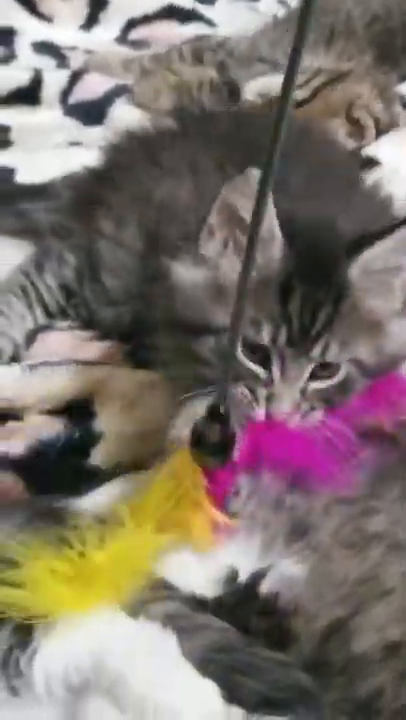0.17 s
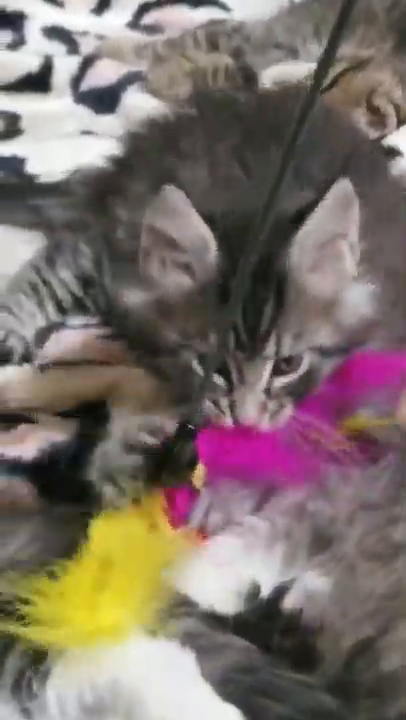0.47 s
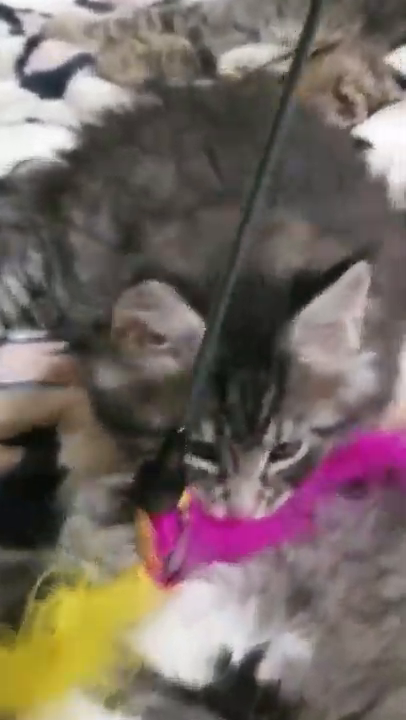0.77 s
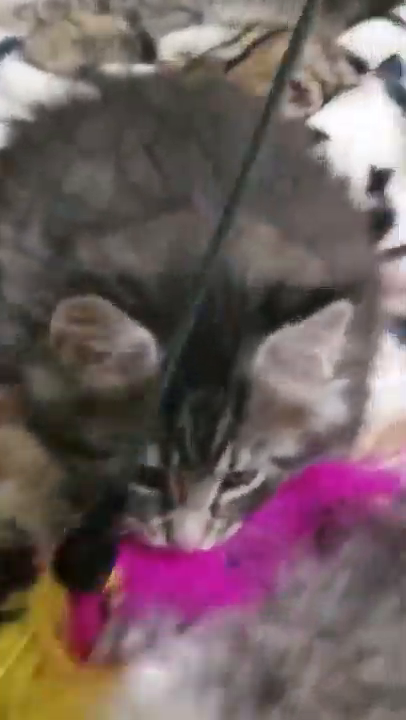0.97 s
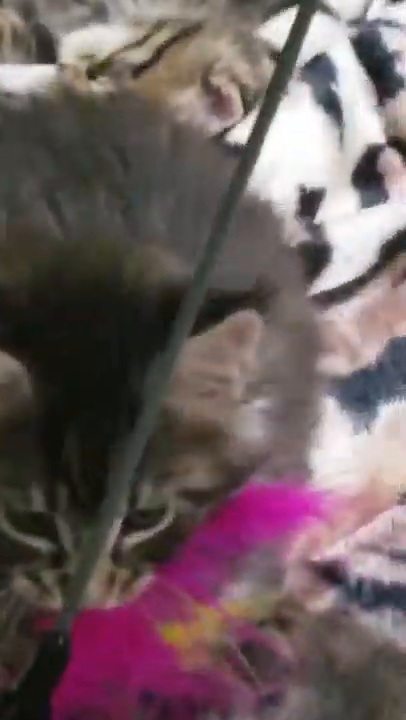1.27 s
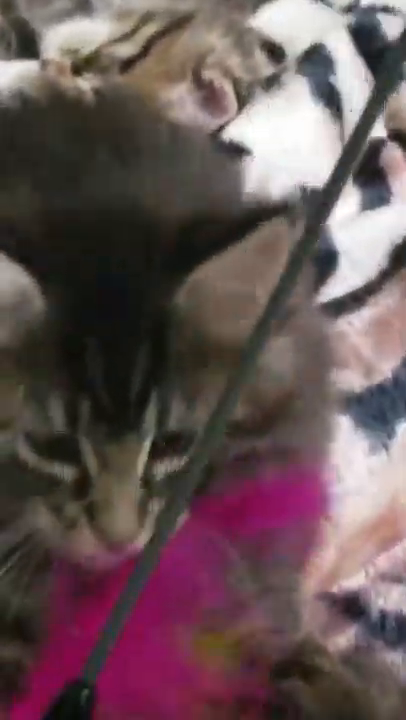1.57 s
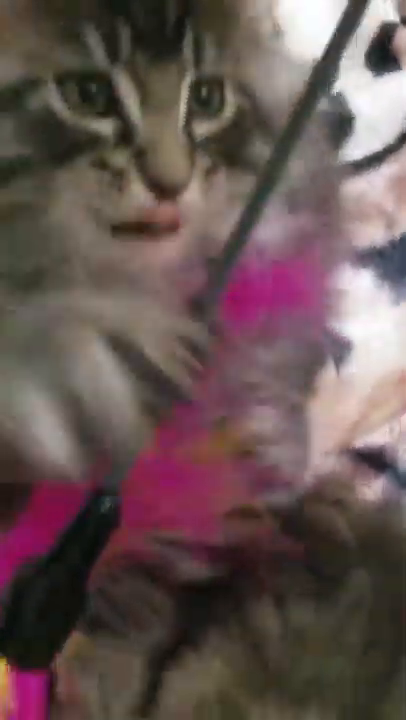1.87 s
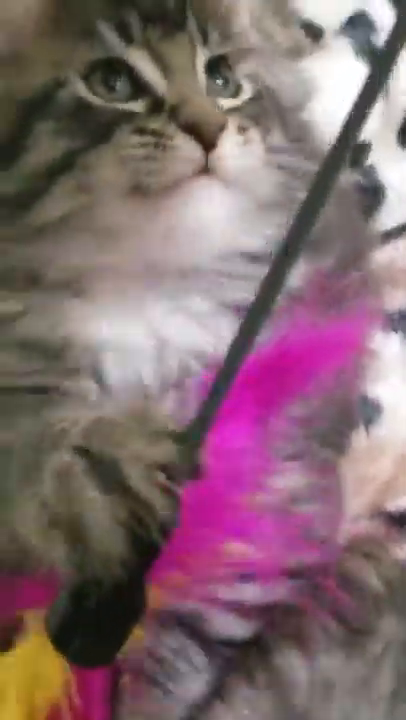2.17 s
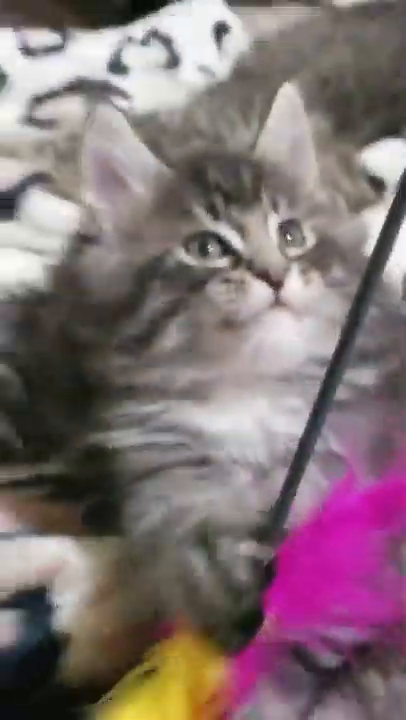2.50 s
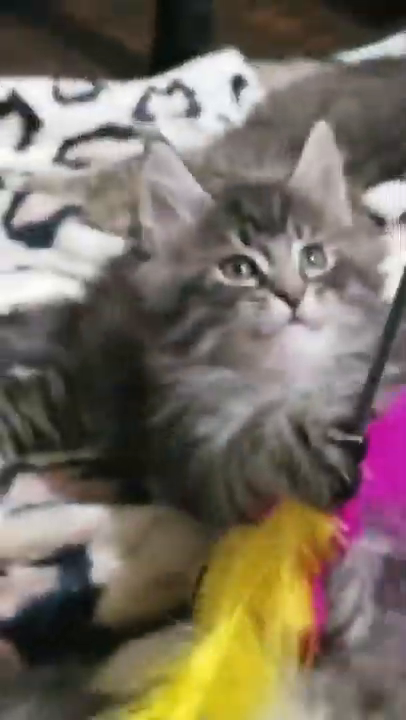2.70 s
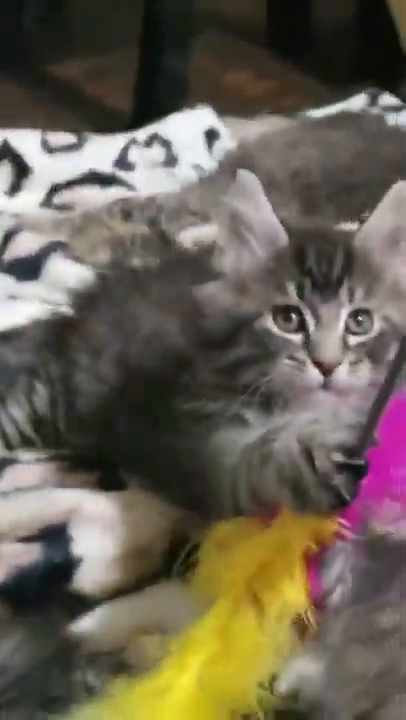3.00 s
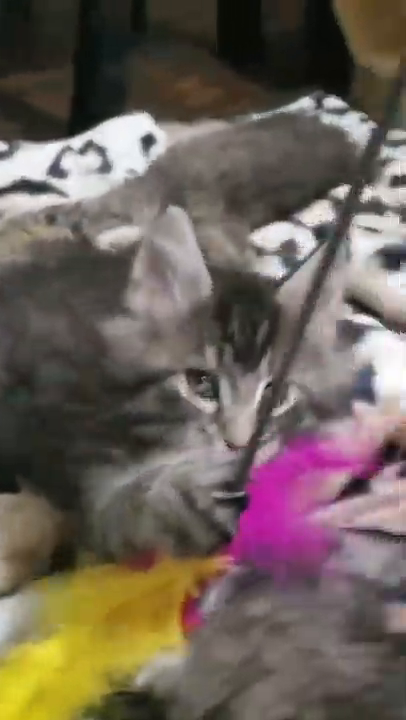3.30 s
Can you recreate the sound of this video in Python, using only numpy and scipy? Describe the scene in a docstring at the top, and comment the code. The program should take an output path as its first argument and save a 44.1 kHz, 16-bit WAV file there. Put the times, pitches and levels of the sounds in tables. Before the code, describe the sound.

A kitten growls in low, rough, fluttering bursts over a feather toy in a quiet room.

```python
"""Kitten growling over a feather toy

On a blanket, close by in a quiet room, a kitten growls in four runs of slow, separate throat flaps. Each flap
is a short thump that leaves low notes ringing, plus mouth rings, noise puffs and ticks; under the last run,
rough breath noise and a low note make a snarl. Filtered noise makes the snuffles, the brushing feathers, the
rubbing blanket and the room air; pats knock on the toy and a low hum wavers."""
import sys
import numpy as np
from scipy import signal
from scipy.fft import rfft, irfft, next_fast_len
from scipy.io import wavfile

SR = 44100
rng = np.random.default_rng(int(sys.argv[2]) if len(sys.argv) > 2 else 0)


def wav_out(sig):
    """Save sig, one row per channel (or a flat mono array), as 16-bit PCM at SR to the path in sys.argv[1]."""
    wavfile.write(sys.argv[1], SR, np.round(np.clip(np.atleast_2d(sig).T, -1, 1) * 32767).astype(np.int16))


N = 152145   # length in samples
T = np.arange(N) / SR   # time in seconds
CRACK_S = 0.0023   # decay time of a mouth crack or a pat's click
SURROUND_PAN_DB = -1.13   # left minus right, for everything but the voice


def from_db(db):
    """Turn decibels into a gain."""
    return 10 ** (np.asarray(db) / 20)


def rms_one(x):
    """Scale to an average (rms) strength of 1."""
    return x / np.sqrt(np.mean(x ** 2) + 1e-20)


def peak_one(x):
    """Scale so that the highest peak is 1."""
    return x / np.abs(x).max()


def level(rows):
    """Gain over time along a curve of (s, dB)."""
    return from_db(np.interp(T, *np.transpose(rows)))


def at_hz(points, hz):
    """Read a curve of (Hz, value) at one frequency, on a logarithmic pitch scale."""
    curve_hz, values = np.array(points).T
    return np.interp(np.log(hz), np.log(curve_hz), values)


def pan(db):
    """Left and right gains that differ by this many dB (positive is left)."""
    return from_db(np.array([[db], [-db]]) / 2)


def drift(rate):
    """Slow chance with spread 1: straight lines between `rate` random points a second."""
    knots = rng.standard_normal(400)
    return rms_one(np.interp(T * rate, np.arange(len(knots)), knots))


def resonate(x, hz, width_hz):
    """One resonance, with a gain of about 1 on top; a narrow one rings longer."""
    r = np.exp(-np.pi * width_hz / SR)
    feedback = [1, -2 * r * np.cos(2 * np.pi * hz / SR), r * r]
    return signal.lfilter(np.array([1, 0, -1]) * (1 - r * r) / 2, feedback, x)


def resonate_twice(x, hz, width_hz):
    """The same resonance twice over, for steeper sides."""
    return resonate(resonate(x, hz, width_hz), hz, width_hz)


def half_shared_air():
    """White noise that is partly the same on left and right."""
    return rng.standard_normal((2, N)) + rng.standard_normal(N)


def add(out, s, x):
    """Mix x into out from time s."""
    i = int(max(s, 0) * SR)
    out[i:i + len(x)] += x[:max(N - i, 0)]


def clicks(times, gains):
    """One single-sample click for each time."""
    return np.bincount(np.clip(times * SR, 0, N - 1).astype(int), gains, N)


def fade(strikes, decay_s):
    """Each click becomes an envelope that dies away."""
    return signal.lfilter([1], [1, -np.exp(-1 / (decay_s * SR))], strikes + 1e-18)


def noise(spectrum, patchy_db):
    """Stereo noise in narrow bands, each with its own level, flicker and likeness; rms 1."""
    # How alike left and right are: hz, likeness (0 to 1)
    likeness = [(60, 0.97), (200, 0.87), (400, 0.81), (800, 0.13), (2000, 0.14), (8000, 0.3), (15000, .25)]
    out = 0
    edges = np.geomspace(25, 17000, 24)
    white = rng.standard_normal((2, 2, N))
    for k, (low, high) in enumerate(zip(edges, edges[1:])):
        band = signal.butter(2, [low, high], "band", fs=SR, output="sos")
        mid, side = signal.sosfilt(band, white[k % 2])
        hz = np.sqrt(low * high)
        alike = np.clip(at_hz(likeness, hz), 0, .99)
        stereo = np.sqrt(1 + alike) * mid + np.sqrt(1 - alike) * side * [[1], [-1]]
        out = out + from_db(at_hz(spectrum, hz) + patchy_db * drift(40)) * stereo
    return rms_one(out)


def thump(hz):
    """A short, smooth push and pull whose pitch sinks through hz at its strongest moment."""
    peak_s, rise_s, fall_s = 0.00351, 0.0015, 0.0031
    sag_s = 0.026   # how slowly the pitch sinks
    t = np.arange(SR // 30) / SR - peak_s
    cycles = hz * sag_s * (1 - np.exp(-t / sag_s))
    swell = np.exp(-.5 * (t / np.where(t < 0, rise_s, fall_s)) ** 2)
    return np.sin(2 * np.pi * cycles) * swell


def ring(hz, width_hz):
    """A softly struck resonance, height 1; the two wide passes soften the strike."""
    struck = resonate(signal.unit_impulse(SR // 20), hz, width_hz)
    return peak_one(resonate_twice(struck, hz, hz))


def background():
    """Room air is soft noise; the hum is a low sine whose phase and loudness waver."""
    # Tone of the room air: hz, relative_level_db
    air_tone = [(15, -43), (25, -11), (69, -1.5), (122, -2), (227, -18.5), (469, -23), (648, -32),
                (4260, -34), (7300, -32.5), (15500, -31.5)]
    air_db, hum_db, hum_hz = -69, -66.5, 122.1
    waver = 0.46   # spread, in radians of phase and as a share of the loudness
    wave = np.sqrt(2) * np.sin(2 * np.pi * hum_hz * T + waver * drift(24))
    hum = from_db(hum_db) * wave * (1 + waver * drift(5.78))
    return hum + from_db(air_db) * noise(air_tone, patchy_db=-3.0)


def rustle():
    """Feathers hiss with tiny barb snaps; the blanket rubs low and unevenly."""
    # Loudness of the brushing feathers: time_s, level_db
    feather_curve = [(0, -83), (.08, -73), (.14, -69), (.27, -78), (.42, -66.5), (.56, -64), (.8, -65.5),
                     (.9, -69), (1.08, -67.5), (1.24, -59.5), (1.36, -67), (1.5, -75), (1.66, -75),
                     (1.74, -69.5), (1.9, -79), (2.14, -79.5), (2.27, -65), (2.4, -61), (2.52, -59),
                     (2.61, -60.5), (2.7, -77.5), (2.9, -77), (3.02, -75), (3.34, -79.5), (3.44, -67.5)]
    # Tone of the feathers: hz, relative_level_db
    feather_tone = [(500, 6.5), (1000, -32), (1600, 4), (2500, 1), (4500, 0.5), (6000, -2), (8000, 14.5),
                    (9300, -10.5), (13000, 5), (16000, -16.5)]
    # Loudness of the blanket shifting under the kitten: time_s, level_db
    blanket_curve = [(0, -80), (.25, -72.5), (.36, -70), (.55, -71.5), (.75, -62), (1.02, -57.5),
                     (1.22, -53.5), (1.39, -50.5), (1.5, -65), (1.66, -61), (1.8, -60.5), (1.95, -61.5),
                     (2.08, -70.5), (2.2, -60.5), (2.42, -48), (2.52, -51.5), (2.66, -65), (2.78, -65),
                     (2.9, -63.5), (2.98, -61), (3.08, -60.5), (3.2, -56.5), (3.33, -68.5), (3.45, -59.5)]
    # Tone of the blanket: hz, relative_level_db
    blanket_tone = [(30, -15.5), (70, -3.5), (100, -6.5), (145, -0.5), (290, -11), (450, -8.5), (650, -16),
                    (1100, -21), (1800, -25.5), (3000, -38.5), (8000, -56)]
    snaps_per_s, snap_db = 990, -10   # snap level is relative to the hiss
    snaps = (rng.random(N) < snaps_per_s / SR) * rng.standard_normal((2, N))
    grains = from_db(snap_db) * rms_one(resonate_twice(snaps, 2800, 7500))
    feathers = level(feather_curve) * (noise(feather_tone, patchy_db=0.77) + grains)
    return feathers + level(blanket_curve) * noise(blanket_tone, patchy_db=2.5)


def pats():
    """Each contact with the toy is a dull knock, a small click and a short rub."""
    # Soft pats and tugs at the toy: time_s, strength_db (before the levels of knock, click and rub)
    contacts = [(0.358, -53.5), (0.614, -47.5), (0.684, -49), (0.817, -54.5), (0.833, -53.5), (2.951, -49),
                (2.988, -46), (3.078, -48.5), (3.12, -47.5), (3.146, -48), (3.185, -41.5), (3.216, -58)]
    # Tone of the rub: hz, relative_level_db
    rub_tone = [(60, -17), (160, 3.5), (520, 2.5), (900, -11), (1900, -15.5), (3200, -59), (12000, -60)]
    knock_hz, knock_db = 282, -5.5
    click_hz, click_db = 1080, -18
    rub_s, rub_db = .012, -5   # rub_s is the decay time
    s, db = np.transpose(contacts)
    hits = clicks(s, from_db(db))
    knock = from_db(knock_db) * signal.fftconvolve(hits, thump(knock_hz))[:N]
    grit = resonate_twice(rng.standard_normal((2, N)), click_hz, 2 * click_hz)
    click = from_db(click_db) * fade(hits, CRACK_S) * rms_one(grit)
    rub = from_db(rub_db) * fade(hits, rub_s) * noise(rub_tone, patchy_db=-1.5)
    return knock + click + rub


def snuffles():
    """Air through one resonance of the kitten's nose or mouth."""
    # Snuffles and hisses: start_s, length_s, attack_s,
    # level_db (middle of a small random wander), resonance_hz, width_hz (of each of two passes)
    breaths = [(0.434, 0.25, 0.06, -73.5, 4270, 1200), (0.476, 0.19, 0.056, -70, 2560, 700),
               (0.908, 0.13, 0.0022, -59.5, 780, 273), (0.9015, 0.061, 0.002, -65, 1550, 905),
               (1.344, 0.054, 0.026, -57.5, 1390, 695), (2.34, 0.17, 0.045, -61, 2130, 1150),
               (2.446, 0.13, 0.041, -67.5, 4300, 1590), (2.568, 0.054, 0.024, -58.5, 1917, 169),
               (2.898, 0.24, 0.12, -66.5, 1940, 457), (3.06, 0.26, 0.033, -79, 1930, 260),
               (3.393, .15, 0.01, -68.5, 1530, 1900)]
    release_s = 0.044
    out = 0
    for start, length, attack, db, hz, width_hz in breaths:
        fade_in, fade_out = (T - start) / attack, (start + length - T) / release_s
        shape = np.clip(np.minimum(fade_in, fade_out), 0, 1)
        air = rms_one(resonate_twice(half_shared_air(), hz, width_hz))
        out = out + from_db(db + 1.3 * drift(90)) * shape * air
    return out


def growl():
    """Each flap and its rebound thump the chest, ring the mouth, crack, tick wetly and puff out air."""
    # Throat flaps: start_s, strength_db (before the levels of each part), chest_pitch_hz,
    # mouth_db and wet_tick_db (both relative to the strength), rebound_share (0 to 1)
    flaps = [(1.067, -38.5, 190, -24, -9, 0.15), (1.094, -34, 185, 0.5, -14, 0),
             (1.134, -34.5, 216, 4, 4, 0), (1.179, -28, 183, 4.5, -6, 0.44),
             (1.197, -36.5, 196, 2.5, 1, 0.16), (1.2399, -25.5, 234, 4, 5.5, 0.4),
             (1.292, -28.5, 238, 4, 4, 0.42), (1.333, -30.5, 201, -2.5, -7, 0),
             (1.3464, -30.5, 199, 3, 6, 0.55), (1.376, -35, 226, -2, -5, 0.34),
             (1.4464, -38, 202, 3, 10, 0), (1.6931, -28.5, 209, 0.5, -9, 0.03),
             (1.714, -36.5, 190, 3, -3, 0.23), (1.739, -30, 215, -4.5, -8, 0),
             (1.75, -32.5, 186, -4, -16, 0.17), (1.788, -33.5, 207, -3, -13, 0.15),
             (1.805, -37.5, 156, -14, -14, 0), (1.817, -35, 155, -13, -19, 0),
             (1.836, -35, 225, -7.5, -6, 0.02), (1.882, -38, 245, -8.5, -8, 0.5),
             (1.911, -41, 190, -23, -8, 0.6), (1.935, -40, 204, 0, -7, 0.22), (1.978, -54, 228, 11, 0, 0),
             (2.166, -36, 198, -11, -8, 0.35), (2.199, -33.5, 204, -43.5, -9, 0.14),
             (2.2314, -32.5, 252, -1, -10, 0.22), (2.259, -32, 194, -27, -12, 0),
             (2.2919, -27.5, 200, -11.5, -7, 0), (2.326, -28, 206, -6, -8, 0),
             (2.356, -25.5, 207, -7.5, -16, 0), (2.376, -31, 232, 1.5, -10, 0.03),
             (2.395, -41, 195, -25, -9, 0.1), (2.529, -31, 252, 5, -11, 0.34),
             (2.545, -37, 256, 10.5, -9, 0.2), (2.557, -30.5, 288, -1.5, -14, 0),
             (2.574, -52, 129, -5, -9, 0), (2.588, -40.5, 190, 10, -8, 0), (2.598, -34.5, 116, 2, -9, 0),
             (2.604, -50, 198, 11.5, -11, 0), (2.626, -52, 126, 13, -12, 0.8),
             (2.641, -45, 123, -3, 10, 0.1)]
    # Low resonances that the thumps leave ringing: pitch_hz, width_hz, gain_db
    low_modes = [(72, 7.4, -8), (140.2, 17.6, 3.5), (187.8, 7.3, -2), (234.5, 7.7, 0), (439, 61, 7)]
    # Fixed mouth resonances: pitch_hz, width_hz, level_db (middle of a random spread)
    mouth_modes = [(432.2, 94, -15), (1070, 63, -30.5), (2280, 1100, -59)]
    # The mouth's main resonance moves from run to run: time_s, pitch_hz (middle of a random spread)
    main_curve = [(1.3, 720), (1.7, 900), (2.36, 870), (2.55, 770)]
    # Tone of the air puffs: hz, relative_level_db
    puff_tone = [(100, -18), (250, 9.5), (450, 12), (680, 4), (1000, 1.5), (1500, -34), (2200, -19),
                 (4000, -26), (8000, -37), (15000, -28)]
    rebound_s = 0.00962   # how long after its flap a rebound comes
    chest_db, main_width_hz, main_db = -3.5, 160, -19.5
    puff_db, puff_s, puff_rise_s = -19, 0.011, 0.0012
    tick_hz, tick_width_hz, tick_level_db, tick_s = 7400, 1800, -24, 0.0013
    crack_hz, crack_width_hz, crack_db = 1340, 1040, -26
    mouth_pan_db = -0.5   # left minus right

    s, db, pitch, mouth_db, tick_db, rebound = np.transpose(flaps)
    times = np.r_[s, s + rebound_s]
    gains = np.r_[from_db(db), from_db(db) * rebound]
    chest = np.zeros(N)
    for start, gain, hz in zip(times, gains, np.tile(pitch, 2)):
        add(chest, start, gain * thump(hz))
    chest = chest + sum(from_db(mode_db) * resonate(chest, hz, width_hz)
                        for hz, width_hz, mode_db in low_modes)

    mouth_gains = gains * from_db(np.tile(mouth_db, 2))
    mouth = np.zeros((2, N))
    for hz, width_hz, mode_db in mouth_modes:
        for ear in mouth:
            uneven_db = mode_db + 1.05 * rng.standard_normal(len(times))
            strikes = clicks(times, mouth_gains * from_db(uneven_db))
            ear -= signal.fftconvolve(strikes, ring(hz, width_hz))[:N]
    for start, gain in zip(times, mouth_gains * from_db(main_db)):
        for ear in mouth:
            hz = np.interp(start, *np.transpose(main_curve)) * (1 + 0.11 * rng.standard_normal())
            add(ear, start, -gain * ring(hz, main_width_hz))

    openings = clicks(times, mouth_gains)
    puff_shape = fade(openings, puff_s) - fade(openings, puff_rise_s)
    puff = from_db(puff_db) * puff_shape * noise(puff_tone, patchy_db=-3.5)
    wet = fade(clicks(times, gains * from_db(np.tile(tick_db, 2) + tick_level_db)), tick_s)
    tick = wet * rms_one(resonate_twice(rng.standard_normal((2, N)), tick_hz, tick_width_hz))
    crack_air = rms_one(resonate(half_shared_air(), crack_hz, crack_width_hz))
    crack = from_db(crack_db) * fade(openings, CRACK_S) * crack_air
    return from_db(chest_db) * chest + (mouth + puff + tick + crack) * pan(mouth_pan_db)


def snarl():
    """Rough breath rings the open mouth under the last run."""
    # Loudness of the snarl, scaling all three parts: time_s, gain_db
    snarl_curve = [(2.524, -71), (2.533, -44.5), (2.6, -46.5), (2.64, -49.5), (2.7, -74), (2.76, -79)]
    # Tone of the breath: hz, relative_level_db
    breath_tone = [(35, -10), (68, 3.5), (250, 11), (460, 4), (620, -16), (1400, -20), (3200, -40)]
    mouth_hz, mouth_width_hz, mouth_db = 753, 160, -11.5
    note_hz, note_db = 73, -3
    mouth = rms_one(resonate_twice(half_shared_air(), mouth_hz, mouth_width_hz))
    breath = noise(breath_tone, patchy_db=4)
    # Quick flaps merge into a low note
    note = from_db(note_db) * np.sin(2 * np.pi * note_hz * T)
    return level(snarl_curve) * (breath + note + from_db(mouth_db) * mouth)


def room(x):
    """Six feedback delays a side make a short tail, dulled by soft furnishings."""
    t60_s, cut_hz = 0.18, 1340   # time for the echoes to fall by 60 dB; treble falls off above the cut
    size = next_fast_len(N + SR)
    hz = np.arange(size // 2 + 1) * SR / size
    echoes = np.zeros((2, len(hz)), complex)
    for k, lag in enumerate(rng.uniform(.012, 0.043, 12)):
        loop = from_db(-60 * lag / t60_s) * np.exp(-2j * np.pi * hz * lag)
        echoes[k % 2] += loop / (1 - loop) * (-1) ** (k // 2)
    # Low echoes are nearly the same on both sides
    shared = 1 / (1 + (hz / 600) ** 2)
    echoes = echoes + shared * (echoes[0] - echoes)
    return irfft(echoes * rfft(x, size) / (1 + 1j * hz / cut_hz), size)[:, :N] / 2


def scene():
    """The kitten and its toy, with a hollow in the treble, the room's short tail and its background."""
    # Where the kitten's head is: time_s, left_minus_right_db
    head_curve = [(1.2, -4), (1.8, -3), (2.36, -3.5), (2.54, -0.1)]
    dip_hz, dip_width_hz, dip_share = 9220, 6650, 0.83   # the hollow; share taken out at its middle
    room_db = -4.5
    behind = background()
    touches = rustle() + pats() + snuffles()
    voice = (growl() + snarl()) * level(head_curve) ** np.array([[.5], [-.5]])
    kitten = voice + touches * pan(SURROUND_PAN_DB)
    kitten = kitten - dip_share * resonate(kitten, dip_hz, dip_width_hz)
    tail = from_db(room_db) * room(kitten.mean(axis=0))
    return kitten + tail + behind * pan(SURROUND_PAN_DB)


def record(dry):
    """The top is cut steeply above 15700 Hz."""
    return signal.sosfilt(signal.ellip(14, .1, 70, 15700, fs=SR, output="sos"), dry)


dry = scene()
out = record(dry)
wav_out(out)
```